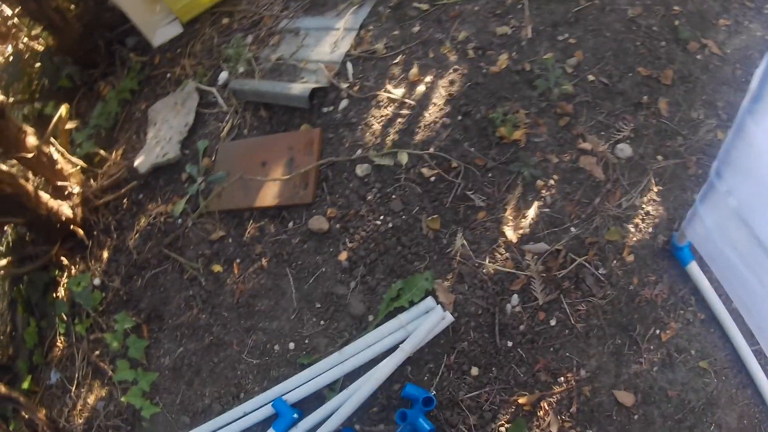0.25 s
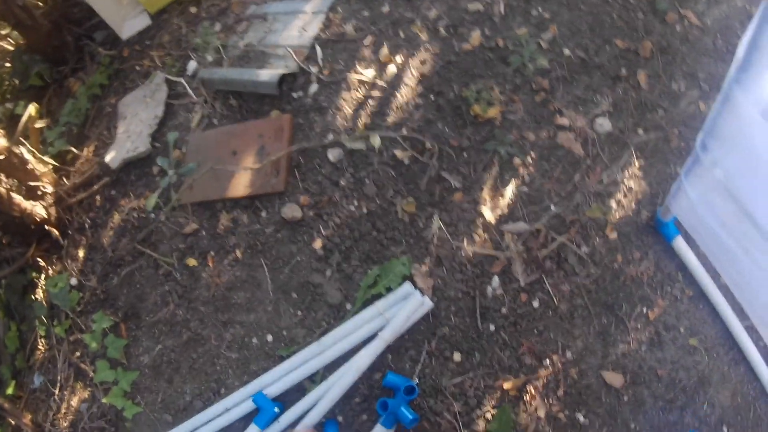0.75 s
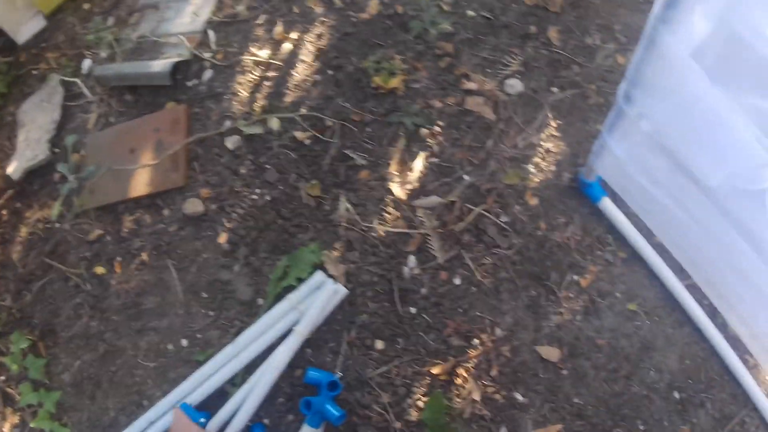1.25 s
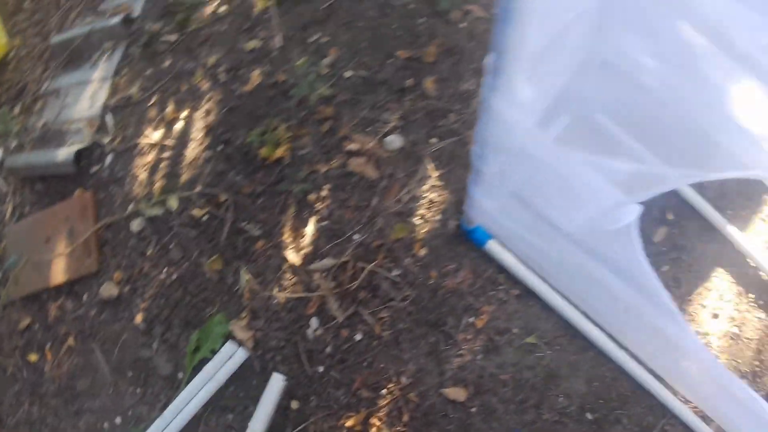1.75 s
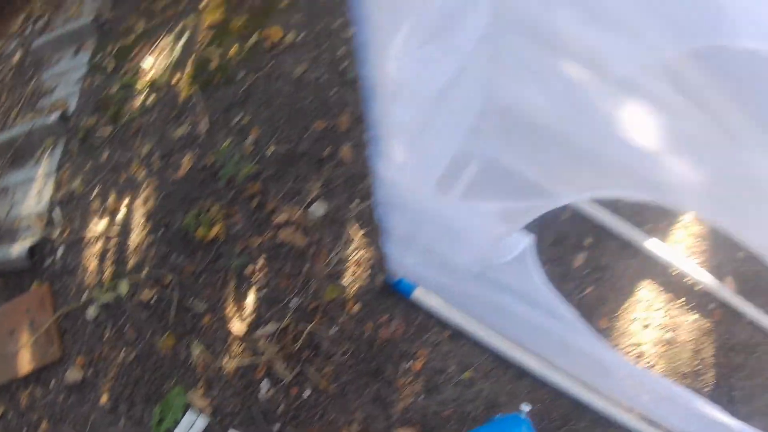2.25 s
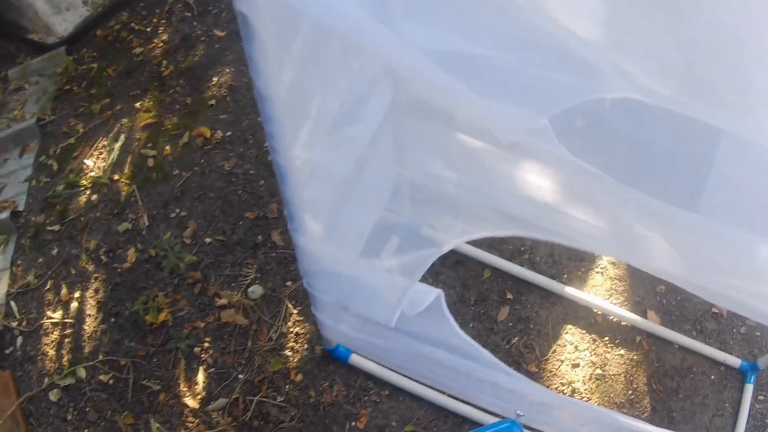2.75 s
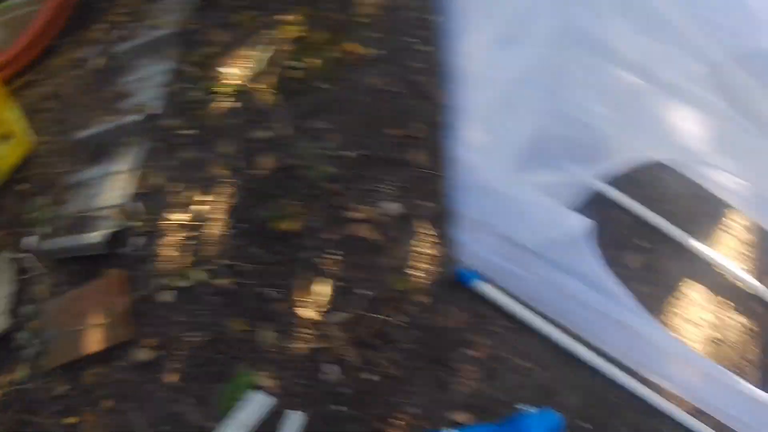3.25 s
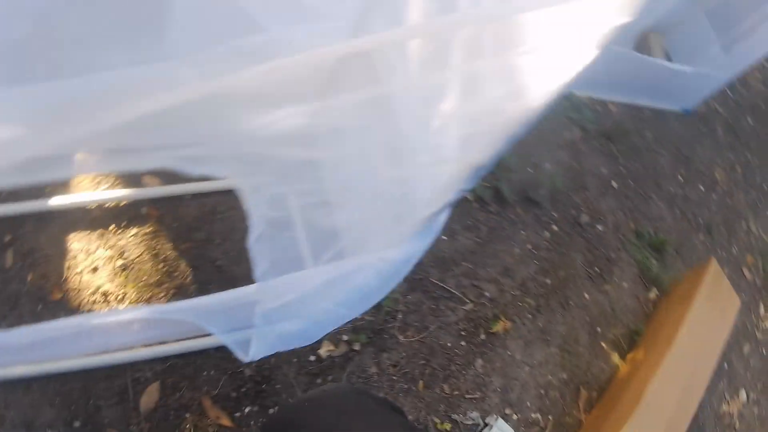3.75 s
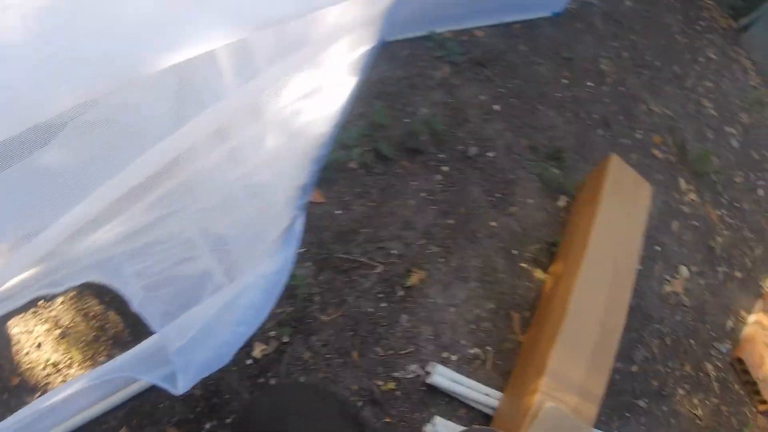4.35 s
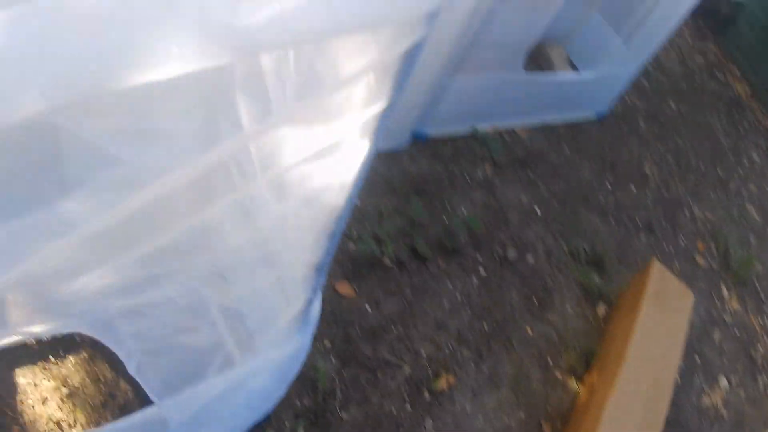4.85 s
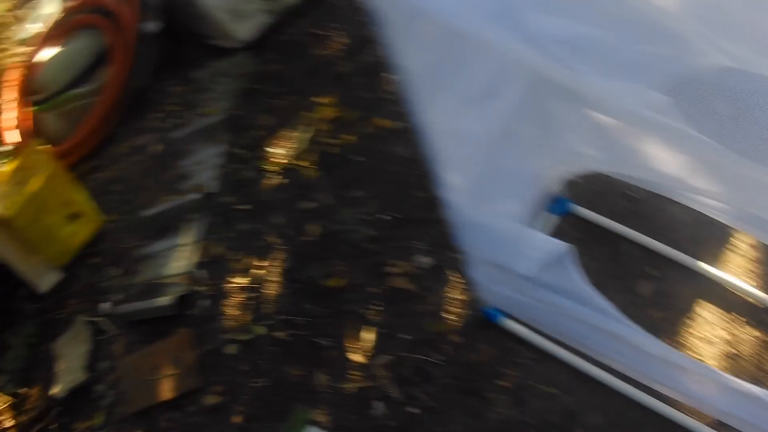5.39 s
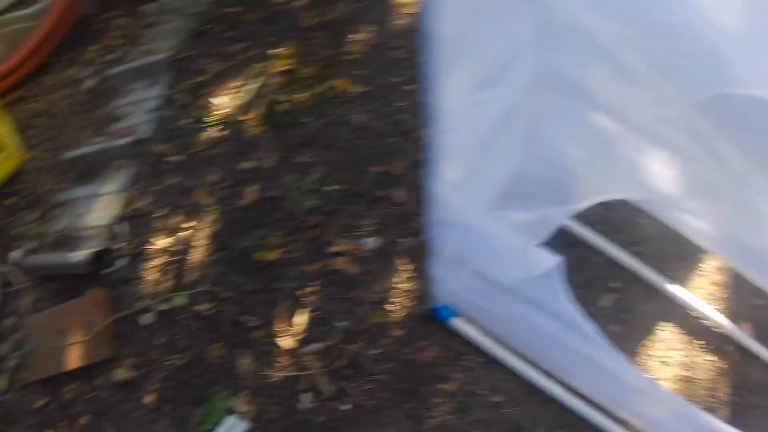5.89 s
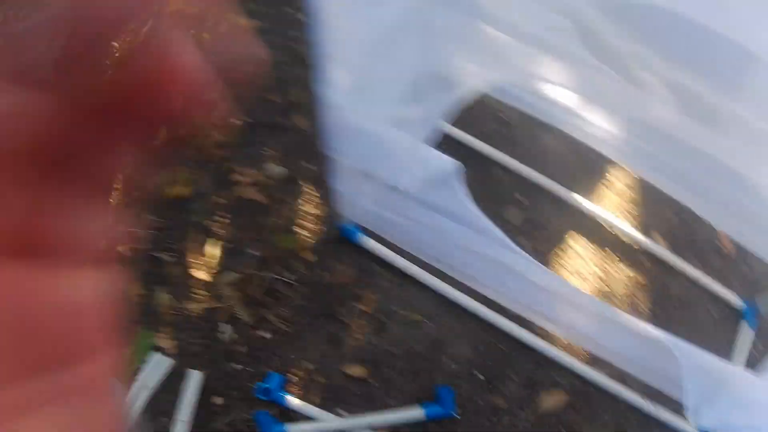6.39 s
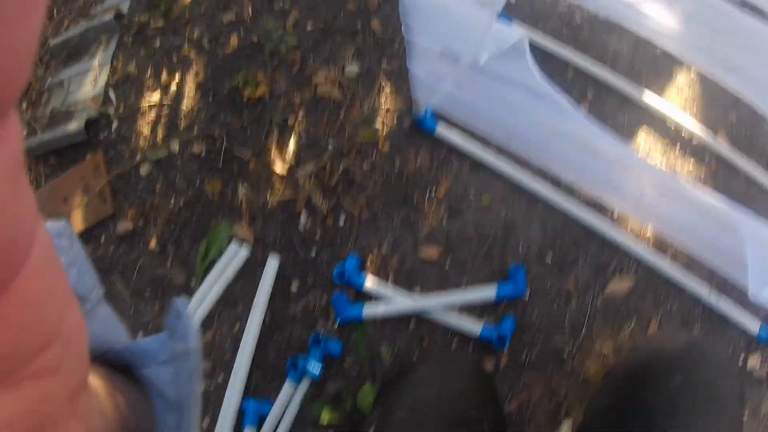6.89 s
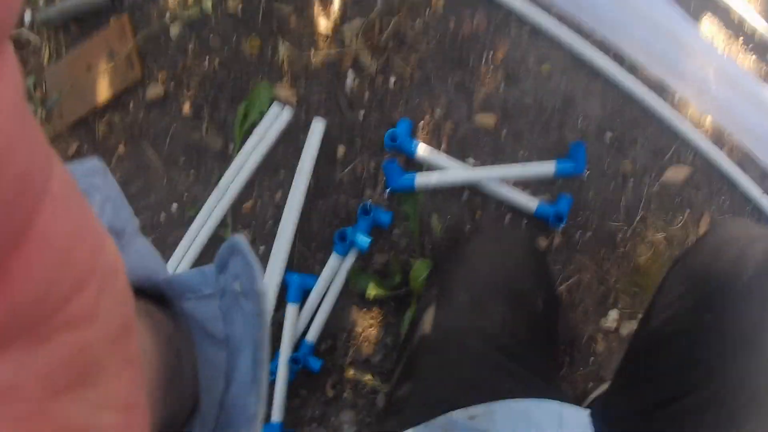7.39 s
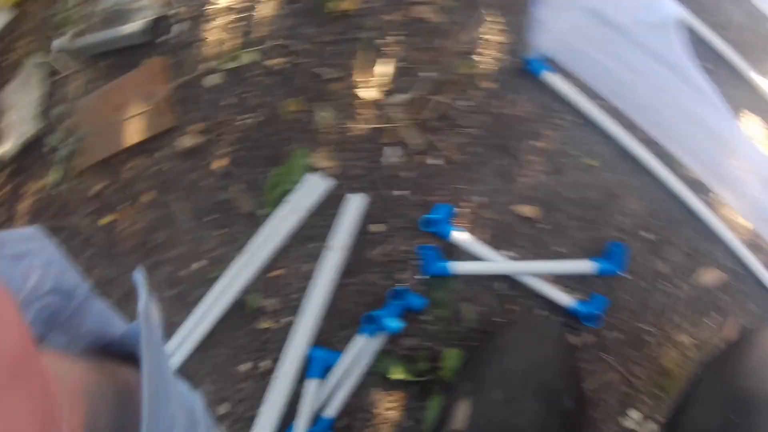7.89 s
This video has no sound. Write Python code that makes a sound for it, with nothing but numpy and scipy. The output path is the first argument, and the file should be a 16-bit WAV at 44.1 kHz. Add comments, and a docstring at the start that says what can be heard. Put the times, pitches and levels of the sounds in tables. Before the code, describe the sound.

Far traffic hums faintly throughout in a yard, heard through a closed camera case that makes things slightly boxy. Hollow plastic tubes clack together in the first quarter second, and a soft scuff follows near 0.7 seconds. A busier run of light knocks and slides lasts from 1.3 to 2 seconds. After a pause, scattered knocks and dull scrapes return from 3.3 to 6.3 seconds, with a hand brushing the case near 5.2. At 6.4 seconds the hand grips the case with a brief squeak, and close skin rubbing and dull bumps become much louder than the tubes. The mount creaks from about 6.7, strongest just after 7 seconds. A catch snaps hard at 7.2 and again at 7.5 seconds, loud enough to overload the microphone. A sharp click near 7.7 leads into more rubbing and bumps until about 8 seconds.

```python
"""Plastic tubes and a handled camera case

Far traffic hums. Hollow plastic tubes are knocked and slid together in a yard, heard by a camera in a
closed case: its wall passes the middle range, treble enters by two small ports. A hand brushes, then
grips the case: skin rubs, slips and squeaks, the mount creaks, and a catch snaps so hard that the
input clips."""
import sys
import numpy as np
from scipy.fft import rfft, irfft, next_fast_len
from scipy.io import wavfile
from scipy.ndimage import map_coordinates

SR = 44100
rng = np.random.default_rng(int(sys.argv[2]) if len(sys.argv) > 2 else 0)


def materialize(psi):
    """Save the field psi as 16-bit PCM at rate SR to the path in sys.argv[1].

    A 1-D psi becomes a single channel; in a 2-D psi each row is a channel.
    """
    bounded = np.clip(np.atleast_2d(psi).T, -1, 1)
    quanta = np.round(bounded * 32767).astype(np.int16)
    wavfile.write(sys.argv[1], SR, quanta)


N = 358533


def amp(db):
    return 10 ** (np.asarray(db) / 20)


def unit_rms(x):
    return x / np.sqrt(np.mean(x ** 2) + 1e-20)


def log_interp(points, hz):
    """(f/Hz, value) points read on a log axis."""
    f, values = np.transpose(points)
    return np.interp(np.log(hz + 1), np.log(f + 1), values)


def curves(rows):
    """One value per sample for each column after t/s."""
    times_s, *columns = np.transpose(rows)
    return [np.interp(np.arange(N) / SR, times_s, c) for c in columns]


def wobble(rate_hz):
    """Smooth random curve, rate_hz knots a second."""
    knots = rng.standard_normal(int(N * rate_hz / SR) + 4)
    return map_coordinates(knots, [np.arange(N) * rate_hz / SR])


def filtered(x, response):
    """Apply a complex frequency response."""
    size = next_fast_len(N + SR // 2)
    return irfft(rfft(x, size) * response(np.fft.rfftfreq(size, 1 / SR)), size)[..., :N]


def resonances(modes, f):
    """Causal sum of band-pass resonances of alternating sign."""
    return sum((-1) ** k * amp(db) * 1j * f * width_hz / (hz * hz - f * f + 1j * f * width_hz)
               for k, (hz, width_hz, db) in enumerate(modes))


def band(f, lo_hz, hi_hz, order):
    """Causal pass band with soft shoulders."""
    return (1j * f / lo_hz / (1 + 1j * f / lo_hz) / (1 + 1j * f / hi_hz)) ** order


def noise(spectrum):
    """Unit-RMS noise shaped by (f/Hz, level/dB) points."""
    return unit_rms(filtered(rng.standard_normal(N), lambda f: amp(log_interp(spectrum, f))))


def grit(spread_db, rate_hz):
    """Friction: noise whose size jumps from grain to grain."""
    return unit_rms(rng.standard_normal(N) * amp(spread_db * wobble(rate_hz)))


def wall(x, right_db):
    """The case wall passes the middle range, right_db louder on the right."""
    return filtered(x, lambda f: band(f, 257, 3000, order=3)) * amp(0.5 + right_db * np.c_[[-.5, .5]])


def ports(shared, alike, hi_hz):
    """Treble enters by two small ports, each with its own resonances, in opposite phase."""
    # port resonances: f/Hz, width/Hz, level/dB
    left = [(2330, 323, 3.5), (3100, 180, -5.5), (4680, 1500, -11), (7500, 280, -23), (10000, 1200, -21)]
    right = [(2460, 810, -4), (3805, 500, -1), (4530, 775, -2), (7950, 4000, -13), (9650, 1400, -25.5)]
    own = np.abs(shared) * rng.standard_normal((2, N))
    pair = alike * shared + np.sqrt(1 - alike ** 2) * own
    return filtered(pair, lambda f: np.array([resonances(left, f), -resonances(right, f)])
                    * band(f, 600, hi_hz, order=5))


def blows(events, modes, voice, contact, scatter_db, focus_db, detune, rattle_db, ring_s, trim_db,
          tick_t60_s):
    """Each blow rings the modes anew, most those near its pitch, and ticks. Returns body, ticks."""
    body, ticks = np.zeros((2, N + SR))
    t = np.arange(int(ring_s * SR)) / SR
    hz, mode_db, t60_s = np.transpose(modes)[:, :, None]
    for at_s, db, pitch_hz, touch_db in events:
        lift_db, tick_db, t60_scale = voice(at_s, hz, db, touch_db)
        distance = np.log(hz / pitch_hz)
        gain_db = mode_db + lift_db + scatter_db * rng.standard_normal(hz.shape)
        gain_db += focus_db * np.exp(-(distance / 0.22) ** 2)
        pulled_hz = hz * (pitch_hz / hz) ** np.exp(-(distance / 0.06) ** 2)  # near modes move onto it
        held_hz = pulled_hz * (1 + detune * rng.standard_normal(hz.shape))  # the grip detunes them
        knots = rng.standard_normal((len(hz), int(ring_s * 200) + 2))
        flutter = np.array([np.interp(t * 200, np.arange(len(k)), k) for k in knots])  # loose contact
        gain_db = gain_db + rattle_db * np.minimum(t * 90, 1) * flutter
        decay_db = 60 * t / (t60_s * np.clip(t60_scale, .1, 2))
        ring = (amp(gain_db - decay_db) * np.cos(2 * np.pi * held_hz * t)).sum(0)
        ring *= 1 - np.exp(-t / 0.0017)
        blow = ring / np.abs(ring).max() + contact(t, db)
        start = round((at_s + 0.0011) * SR)  # sounds about 1 ms after its listed time
        body[start:][:len(t)] += amp(db + trim_db) * blow / np.abs(blow).max()
        tick = np.sign(rng.standard_normal(len(t)))
        ticks[start:][:len(t)] += amp(db + tick_db - 60 * t / tick_t60_s) * tick
    return body[:N], ticks[:N]


def contact_pulse(t, hz, rise_s, db):
    """The contact itself: a short pulse ahead of the ring."""
    return amp(db) * t / rise_s * np.exp(1 - t / rise_s) * np.cos(2 * np.pi * hz * t)


def rubbing(gains, modes, spread_db, fizz_spread_db, rate_hz):
    """Grit through the modes (body) and bare grit (fizz), each under its own gain."""
    body = unit_rms(filtered(grit(spread_db, rate_hz), lambda f: resonances(modes, f)))
    return gains * [body, grit(fizz_spread_db, rate_hz)]


def traffic():
    """Far traffic, its rumble and hum wavering, over a steady hiss."""
    # traffic levels: t/s, rumble/dB, hum/dB
    levels = [(0, -53, -51), (1.4, -51.5, -56), (2.2, -51, -53), (3.5, -49.5, -52), (4.2, -47, -50.5),
              (5, -45, -51), (6, -45.5, -49.5), (6.5, -45.5, -57), (7.2, -47.5, -49), (8.13, -49, -55)]
    # spectra of traffic, in-phase hiss and antiphase hiss: f/Hz, level/dB
    rumble = [(12, -38.5), (20, -3), (113, -2), (184, -6), (248, -3.5), (304, -7), (400, -18.5),
              (520, -65.5), (880, -120)]
    hum = [(220, -38.5), (380, -11.5), (482, -4), (560, -13.5), (624, 1), (672, -3), (880, 3), (1030, -6.5),
           (1700, -34.5), (2210, -58.5), (3740, -120)]
    mid_hiss = [(880, -34), (1500, 1), (1700, -1), (2210, -3.5), (2530, -2.5), (8050, -19.5),
                (10000, -31.5), (13000, -36)]
    side_hiss = [(12, -32), (20, 2), (80, -7), (113, -10.5), (236, -6.5), (285, -30), (317, -10.5),
                 (576, -18.5), (889, -17.5), (2060, -23.5), (4640, -35), (8200, -43.5), (13000, -71.5)]
    # balance: f/Hz, left over right/dB
    balance = [(60, -2.5), (150, -2.0), (360, -2), (870, 0), (2130, 2), (5210, 9.5), (12700, 6)]
    rumble_db, hum_db = curves(levels)
    hum_db += wobble(5) + wobble(14)
    rumble_db += 1.2 * wobble(3.283)
    mid = amp(rumble_db) * noise(rumble) + amp(hum_db) * noise(hum) + amp(-72.5) * noise(mid_hiss)
    side = amp(-60) * noise(side_hiss)
    pair = np.array([mid + side, mid - side])
    return filtered(pair, lambda f: amp(np.outer([.5, -.5], log_interp(balance, f))))


def tube_slides():
    """Tubes dragged over cloth or soil: dull scuffs that swell and fade. Returns body, fizz."""
    # strokes: peak t/s, length/s, body/dB, fizz/dB
    strokes = [(.008, 0.027, -31, -25), (0.731, 0.12, -32.5, -47), (0.749, 0.035, -32, -47),
               (0.785, 0.075, -35.5, -46), (1.373, 0.095, -37.5, -36.5), (1.518, 0.11, -30.5, -34.5),
               (1.636, 0.15, -34.5, -38.5), (1.719, 0.11, -35.5, -38), (1.838, 0.12, -43, -38),
               (3.635, 0.081, -30, -50), (3.962, 0.19, -43.5, -46), (4.473, 0.23, -29.5, -44),
               (5.16, 0.29, -42.5, -39.5), (5.328, 0.087, -37, -41), (5.414, 0.077, -34, -41),
               (5.835, 0.22, -38.5, -37.5), (6.009, 0.19, -62, -36.5), (6.143, 0.071, -40, -31.5),
               (6.374, 0.24, -44, -40)]
    # scuff resonances: f/Hz, width/Hz, level/dB
    scuff = [(456, 200, 0.5), (752, 210, 5.5), (983, 230, 0.5), (1660, 330, -16), (2420, 370, -23.5)]
    swell_share = 0.43
    power, t = np.zeros((2, N)), np.arange(N) / SR
    for peak_s, length_s, *db in strokes:
        shape = np.interp((t - peak_s) / length_s, [-swell_share, 0, 1 - swell_share], [0, 1, 0])
        power += np.outer(amp(db), shape) ** 2
    return rubbing(np.sqrt(power), scuff, spread_db=2, fizz_spread_db=4, rate_hz=410)


def tubes():
    """Knocked and slid tubes: the air column rings longest, the tube wall pings above it."""
    # air column and wall modes: f/Hz, level/dB, t60/s
    modes = [(272.6, -10.5, 0.15), (382, -8.5, 0.019), (418, -7, 0.03), (583, -7, 0.19),
             (782.4, -10.5, 0.12), (803, -4, 0.039), (996, 0, 0.019), (1166, -1.5, 0.054),
             (1250, -13, 0.057), (1650, -5.5, 0.064)]
    # knocks: t/s, level/dB, pitch/Hz, hardness/dB
    knocks = [(0.014, -28, 847, -9), (0.048, -32.5, 574, -11), (0.112, -18.5, 1172, -1),
              (0.121, -13, 596, -5), (0.172, -27, 1220, 0), (0.189, -22.5, 797, -1), (0.203, -28, 800, -11),
              (0.244, -36, 820, -5), (1.349, -25.5, 846, -4), (1.388, -25, 1130, -3), (1.423, -32, 786, -8),
              (1.459, -29, 573, -3), (1.495, -19, 970, -12), (1.527, -25, 810, -22), (1.545, -28, 900, -10),
              (1.602, -29.5, 563, -5), (1.644, -24, 805, -18), (1.698, -20, 940, -1),
              (1.705, -24, 785, -20.5), (1.72, -27.5, 900, -10), (1.812, -27.5, 574, -22),
              (1.835, -34.5, 560, -6), (1.873, -37, 900, 8), (1.906, -25.5, 750, -5), (1.957, -31, 780, -2),
              (1.985, -28.5, 864, -15), (2.011, -29.5, 870, -18), (3.298, -18, 665, -7.5),
              (3.393, -29.5, 584, -8), (3.608, -16, 874, -7), (3.624, -20, 1130, 6), (3.639, -24, 700, -16),
              (3.947, -35, 756, 0), (3.972, -33.5, 568, 8), (4.432, -28.5, 704, -19),
              (4.469, -34, 690, -29), (4.587, -30, 683, 1), (5.204, -31, 830, 7), (5.245, -32.5, 1640, 6),
              (5.312, -25.5, 789, -22), (5.853, -34, 855, 2), (6.004, -32, 730, -3),
              (6.039, -34.5, 856, 10), (6.084, -30, 1100, -3), (6.091, -23.5, 900, -8),
              (6.102, -19.5, 1148, -10), (6.138, -18.5, 996, -11), (6.29, -30.5, 694, -5)]
    ping_above_hz = 1450

    def voice(at_s, hz, db, hardness_db):
        """Harder knocks ping and tick more; a weaker knock's ping dies sooner."""
        is_ping = hz > ping_above_hz
        return is_ping * hardness_db, -3 + 0.38 * hardness_db, amp(is_ping * 0.2 * (db + 18.5))

    def contact(t, db):
        return contact_pulse(t, hz=753.5, rise_s=0.00075, db=-0.5 + 0.2 * db)

    detune = 0.013 * np.array([[3.4 if hz > ping_above_hz else 1] for hz, *_ in modes])
    ring, tick = blows(knocks, modes, voice, contact, scatter_db=3, focus_db=9, detune=detune,
                       rattle_db=2.5, ring_s=0.24, trim_db=1.5, tick_t60_s=0.05)
    body, fizz = tube_slides()
    return wall(ring + body, right_db=1.56) + ports(tick + fizz, alike=0.78, hi_hz=5800)


def hand():
    """Skin rubs the case and slips on it in short dull knocks."""
    # case modes: f/Hz, level/dB, t60/s
    modes = [(340, -7.5, 0.034), (441.4, 0.5, 0.031), (514, -1, 0.023), (770, -5, 0.012),
             (1211, -10, 0.014), (1408, -15.5, 0.011), (3200, -14.5, 0.0035)]
    # skin slips: t/s, level/dB, pitch/Hz, tick/dB
    slips = [(5.15, -17.5, 348, -30), (5.157, -20.5, 400, -28), (5.166, -22.5, 380, -30),
             (5.315, -24, 350, -20), (6.534, -21, 600, 10), (6.567, -22, 800, 3), (6.611, -13.5, 474, 24),
             (6.658, -12, 800, -2), (6.666, -6.5, 445, 8), (6.675, -6, 600, -6), (6.792, -25, 452, 16),
             (6.892, -16, 494, -4.5), (6.924, -17.5, 540, -12), (6.974, -13.5, 436, 8),
             (7.179, -13, 800, -10), (7.181, -12.5, 428, 24), (7.192, -18, 410, -20),
             (7.313, -26, 480, -20), (7.339, -28, 800, 8), (7.349, -15.5, 855, 10.5),
             (7.398, -26, 461, -14.5), (7.44, -18, 540, -21), (7.451, -22, 560, -20),
             (7.475, -21, 446, -22), (7.506, -14.5, 410, -21), (7.59, -21, 397, -20),
             (7.643, -14.5, 460, -22), (7.657, -19, 444, -19), (7.694, -17.5, 309, -12),
             (7.743, -14.5, 440, -20), (7.762, -22, 600, 12), (7.798, -3, 445, 15), (7.818, -18, 430, 10),
             (7.847, -20.5, 800, 10), (7.87, -7, 770, 4), (7.877, -8.5, 770, 0), (7.883, -16, 770, 1),
             (7.901, -8.5, 444, -17), (7.943, -8.5, 476, 4.5), (7.956, -12, 447, 2), (7.963, -13.5, 440, 1)]
    # rubbing: t/s, body/dB, fizz/dB
    grip = [(6.43, -51, -50), (6.438, -31.5, -22), (6.475, -23, -17), (6.5, -29, -19), (6.53, -49, -41),
            (6.536, -23.5, -10), (6.553, -34, -14), (6.565, -25, -10.5), (6.59, -27.5, -13),
            (6.62, -22.5, -16), (6.655, -20.5, -9.5), (6.675, -20.5, -7), (6.73, -23, -17),
            (6.75, -25, -21), (6.765, -32.5, -18.5), (6.8, -27.5, -22), (6.83, -31.5, -37),
            (6.98, -26.5, -27), (7.06, -39.5, -25), (7.13, -41, -23), (7.16, -44, -37), (7.2, -29.5, -11.5),
            (7.26, -47, -52), (7.35, -43.5, -31), (7.42, -37, -44), (7.52, -39.5, -39), (7.54, -25.5, -17),
            (7.6, -44, -45), (7.72, -38, -31.5), (7.78, -30, -22), (7.81, -26.5, -18), (7.885, -22, -17.5),
            (7.925, -35, -30.5), (7.965, -31.5, -13), (8.0, -53, -54)]
    release_s = 7.74

    def voice(at_s, hz, db, tick_db):
        """Stronger slips lift the upper modes; the hand damps the ring until it lets go."""
        lift_db = (hz > 650) * (15 + 0.9 * db) + (hz > 2500) * tick_db / 2
        return lift_db, tick_db, 0.65 if at_s < release_s else 1.44

    def contact(t, db):
        return contact_pulse(t, hz=770, rise_s=0.00048, db=1.3 + 0.39 * db)

    def treble_response(f):
        """Rasp peaking near 4 kHz, then a steep low-pass; ticks are duller than fizz."""
        rasp = amp(-3.5) * (1 + resonances([(4180, 1100, 4.17)], f))
        rolloff = 1 / (1 + (f / 7300) ** 8) / (1 + 1j * f / 6000)
        return rasp * rolloff * np.array([1 / (1 + (f / 5600) ** 10), np.ones_like(f)])

    ring, tick = blows(slips, modes, voice, contact, scatter_db=5, focus_db=10.5, detune=0.045,
                       rattle_db=2, ring_s=0.084, trim_db=-1.17, tick_t60_s=0.0093)
    rubbed_modes = [(hz, 0.79 * np.log(1000) / (np.pi * t60_s), db) for hz, db, t60_s in modes[:-1]]
    body, fizz = rubbing(amp(curves(grip)), rubbed_modes, spread_db=3.5, fizz_spread_db=2.5, rate_hz=300)
    treble = filtered(np.array([tick, fizz]), treble_response).sum(0)
    return wall(ring + body, right_db=3.2) + ports(treble, alike=0.75, hi_hz=6600)


def creak():
    """One joint of the mount slips again and again, each time the same short push."""
    # joint slips: t/s, level/dB
    slips = [(6.66, -9.5), (6.688, -10.5), (6.827, -23.5), (6.844, -27), (6.861, -27), (6.871, -22.5),
             (6.916, -20.5), (6.935, -17), (6.956, -21), (6.966, -12.5), (7.0093, -5), (7.0185, -4.5),
             (7.0302, -4), (7.0573, -12.5), (7.0584, -1.5), (7.0729, -3.5), (7.0862, -1.5), (7.096, -1),
             (7.1055, -1), (7.1153, -1), (7.1292, -0.7), (7.7618, -13)]
    # joint resonances: f/Hz, width/Hz, level/dB
    joint = [(455, 114, 38.5), (870, 104, 25.5), (1682, 484, 27), (1254, 1130, 26.5), (3100, 1200, 21),
             (4400, 700, 13)]
    at_s, db = np.transpose(slips)
    lowest_mode_db = db + 1.4 * rng.standard_normal(len(at_s))
    pushes = np.zeros((2, N))
    pushes[:, np.round(at_s * SR).astype(int)] = amp([lowest_mode_db, db])
    ring = filtered(pushes, lambda f: np.array([resonances(joint[:1], f), -resonances(joint[1:], f)])
                    / (1 + 1j * f / 6500) ** 4).sum(0)  # low-pass: softness of the slip
    return wall(ring, right_db=1.9) + amp(13) * ports(pushes[1], alike=1, hi_hz=2500)


def squeak():
    """Skin squeaks as the hand lands: a narrow band and its octave, nearer the right port."""
    # squeak: start/s, peak/s, end/s, level/dB, bands (f/Hz, width/Hz, level/dB)
    skin_squeak = (6.434, 6.46, 6.52, -42, [(3830, 270, 0), (7660, 350, -9.5)])
    *times_s, db, bands = skin_squeak
    tone = unit_rms(filtered(rng.standard_normal(N), lambda f: resonances(bands, f) ** 2))
    envelope = np.interp(np.arange(N) / SR, times_s, [0, 1, 0]) ** .5
    return amp(db) * envelope * tone * amp([[-8], [4]])


def rasps():
    """Brief dry rasps: grit in one narrow band."""
    # strokes, silent if end precedes start: start/s, peak/s, end/s, level/dB
    strokes = [(5.98, 5.995, 5.97, -58), (6.14, 6.15, 6.1, -58), (6.655, 6.67, 6.72, -47),
               (7.343, 7.352, 7.357, -44.5)]
    # rasp band: f/Hz, width/Hz, level/dB
    colour = [(4310, 800, 0)]
    t = np.arange(N) / SR
    envelope = sum(amp(db) * np.interp(t, times_s, [0, 1, 0]) for *times_s, db in strokes)
    rasp = unit_rms(filtered(grit(spread_db=3, rate_hz=300), lambda f: resonances(colour, f) ** 2))
    return envelope * rasp * amp([[-3], [2.5]])


def catch_snaps():
    """A catch lets go: a burst of force jolts the case, shoves the camera and cracks in both ports."""
    # bursts: t/s, low thump/dB, thump/dB, crack/dB, length/s, push/dB
    bursts = [(7.2138, 12, 16, -5, 0.0019, -36.5), (7.2158, 6.5, 4.5, 7.5, 0.0041, -39.5),
              (7.2232, 15.5, 14.5, 1.5, 0.0018, -15), (7.2255, 18, 17, 15, 0.003, -19),
              (7.23, -9.5, 1.5, -25, 0.003, -38.5), (7.235, -7.5, -13.5, -16.5, 0.01, -30),
              (7.5451, -2, -4.5, -18, 0.005, -39.5), (7.547, 21.5, 16, -13, 0.00396, -10),
              (7.551, 13, 1, 6, 0.00083, -40), (7.557, 1, -3, -38, 0.0067, -36),
              (7.7383, -6, -10, 12, 0.0016, -37)]
    # resonances of jolted case, shoved camera and catch: f/Hz, width/Hz, level/dB
    case_modes = [(255, 108, 3.5), (543, 210, 2), (850, 118, 3)]
    shove_modes = [(48.7, 29, 9.5), (150, 110, 0.5)]
    catch_modes = [(1240, 550, -5.5), (3870, 390, -5)]

    def case_response(f):
        low, upper = resonances(case_modes[:1], f), resonances(case_modes[1:], f)
        return np.array([[low], [-upper]]) * band(f, 120, 9000, order=2)

    jolt, crack, push = np.zeros((2, 2, N)), np.zeros(N), np.zeros(N)
    t = np.arange(SR // 10) / SR
    for at_s, low_db, thump_db, crack_db, length_s, push_db in bursts:
        span = slice(round(at_s * SR), round(at_s * SR) + len(t))
        force = np.where(t < length_s, 1, amp(-60 * (t - length_s) / 0.0032))
        force += amp(-26.5 - 60 * t / 0.09)  # faint tail
        shake = rng.standard_normal((3, len(t)))  # shared, left, right
        jolt[..., span] += amp([[[low_db]], [[thump_db]]]) * force * (shake[0] + shake[1:] / 5)
        crack[span] += amp(crack_db) * force * shake[0]
        push[span] += amp(push_db) * force
    thump = filtered(jolt, case_response).sum(0)
    shove = filtered(push, lambda f: resonances(shove_modes, f) * 1j * f / (40 + 1j * f))
    clack = filtered(crack, lambda f: resonances(catch_modes, f))
    body = thump + shove * amp([[1.5], [-1.5]]) + clack * amp([[2.5], [-2.5]])
    return body + ports(crack, alike=0.98, hi_hz=19200)


def scene():
    return traffic() + tubes() + hand() + creak() + squeak() + rasps() + catch_snaps()


def record(dry):
    """The input clips near full scale; the top treble rolls off up to a hard band limit."""
    ceiling, rolloff_hz, limit_hz = 0.9, 11000, 13334
    clipped = dry / (1 + np.abs(dry / ceiling) ** 8) ** (1 / 8)
    return filtered(clipped, lambda f: np.clip((limit_hz - f) / 700, 0, 1)
                    / np.sqrt(1 + (f / rolloff_hz) ** 24))


dry = scene()
out = record(dry)
materialize(out)
```